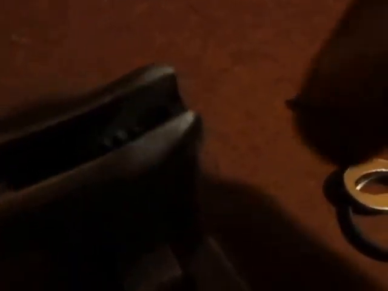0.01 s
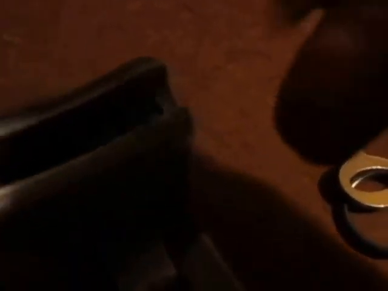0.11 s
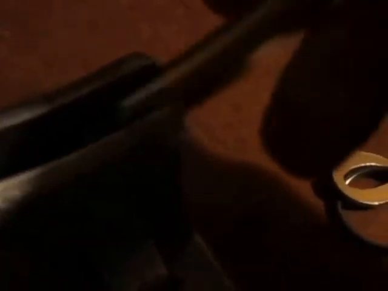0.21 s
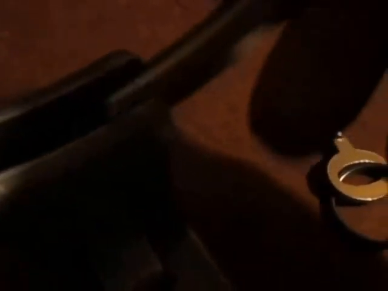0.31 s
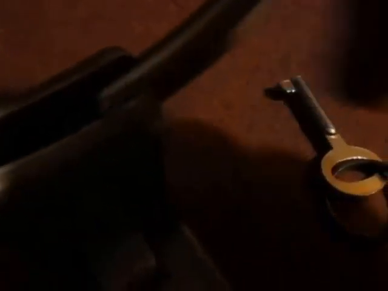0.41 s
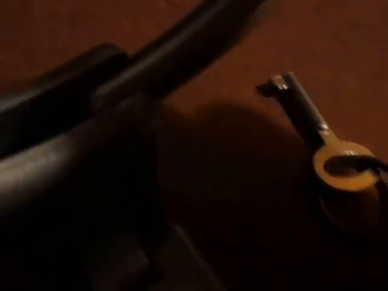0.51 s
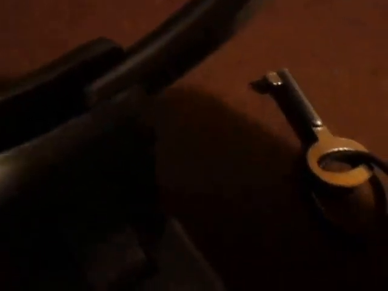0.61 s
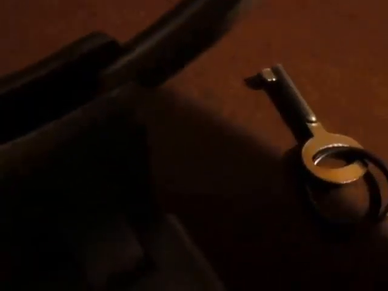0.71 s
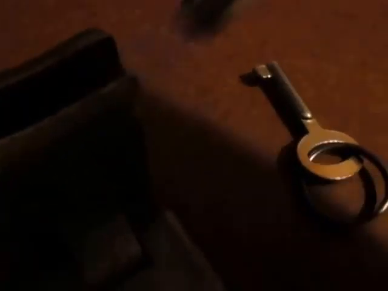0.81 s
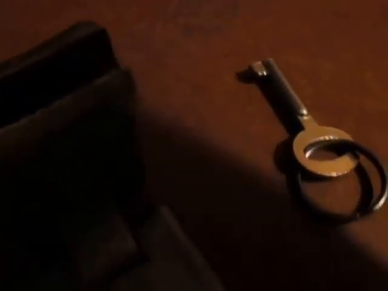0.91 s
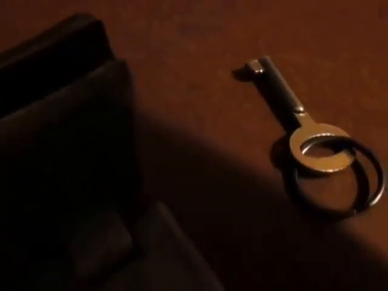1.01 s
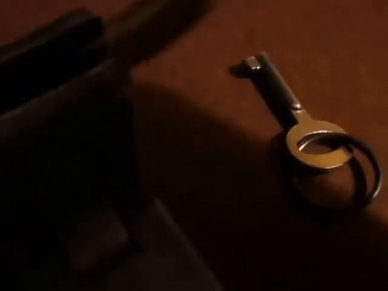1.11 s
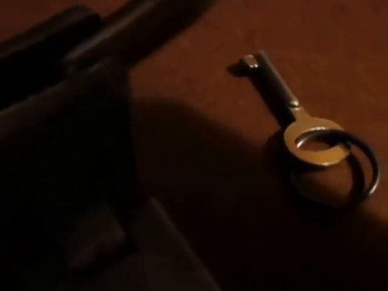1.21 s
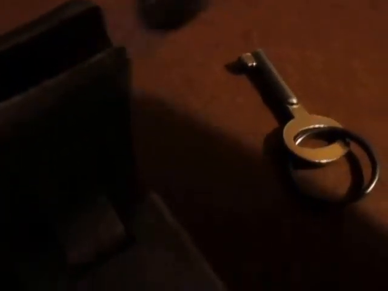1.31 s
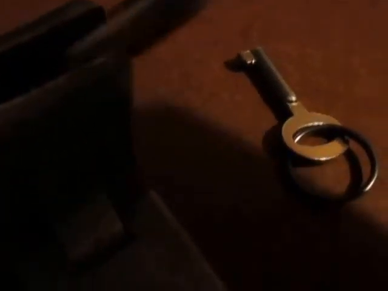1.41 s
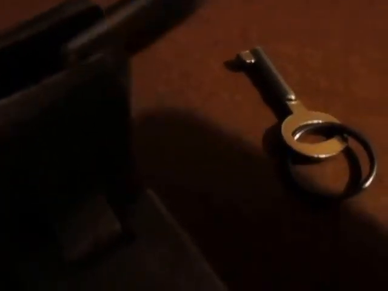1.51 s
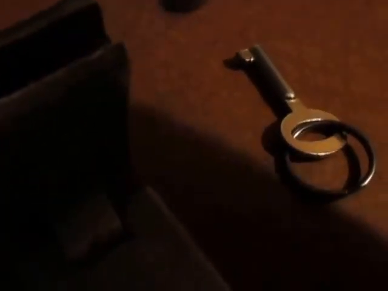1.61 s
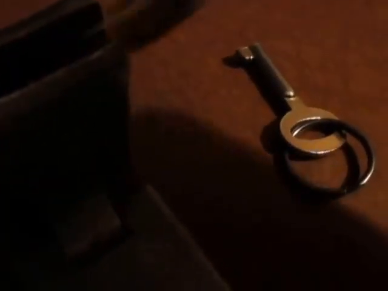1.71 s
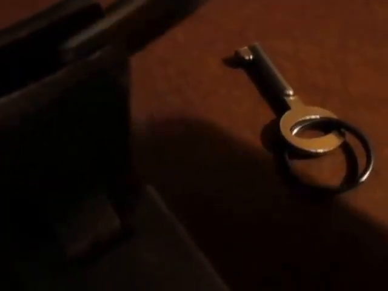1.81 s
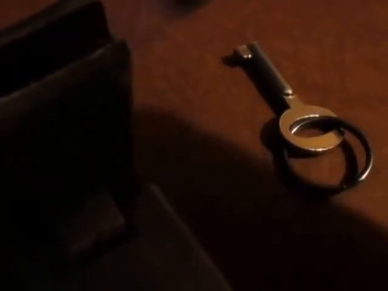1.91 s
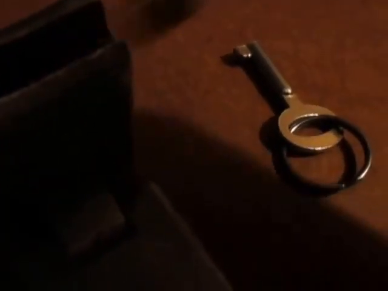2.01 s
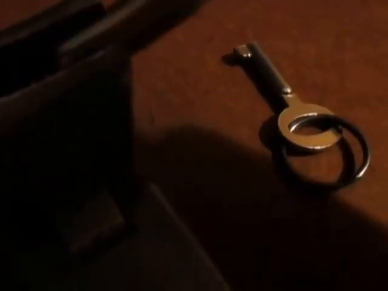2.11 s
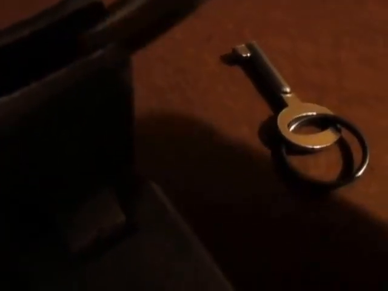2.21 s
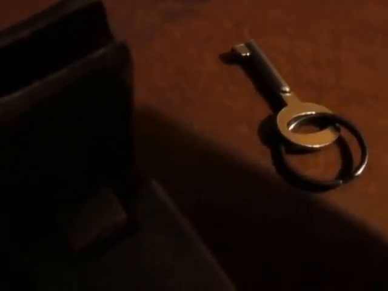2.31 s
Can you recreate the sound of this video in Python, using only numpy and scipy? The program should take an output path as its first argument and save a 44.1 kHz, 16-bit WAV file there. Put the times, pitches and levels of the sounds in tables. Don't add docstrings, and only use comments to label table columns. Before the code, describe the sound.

Metal handcuffs snap through their ratchet in sharp double clicks, knocking on a wooden table

```python
import sys
import numpy as np
from scipy import signal
from scipy.fft import rfft, irfft
from scipy.io import wavfile
from scipy.ndimage import uniform_filter1d, minimum_filter1d, map_coordinates

SR = 44100
rng = np.random.default_rng(int(sys.argv[2]) if len(sys.argv) > 2 else 0)


def gain_from_decibels(decibels):
    exponent = np.asarray(decibels, float) / 20
    return 10 ** exponent


def file_out(sig):
    cols = np.atleast_2d(sig).T
    lim = np.clip(cols, -1, 1)
    pcm = np.round(lim * 32767).astype(np.int16)
    wavfile.write(sys.argv[1], SR, pcm)


N = 105840


def unit(x):
    return x / np.sqrt(np.mean(x ** 2) + 1e-20)


def along(points, hz):
    point_hz, value = np.transpose(points)
    return np.interp(np.log(hz + 1), np.log(point_hz + 1), value)


def curve(rows):
    return np.interp(np.arange(N) / SR, *np.transpose(rows))


def wobble(rate):
    knots = rng.standard_normal(int(N / SR * 100))
    return map_coordinates(knots, [np.arange(N) * min(rate, 90) / SR])


def noise(spectrum, size=N):
    shape = gain_from_decibels(along(spectrum, np.fft.rfftfreq(size, 1 / SR)))
    return unit(irfft(rfft(rng.standard_normal(size)) * shape, size))


def add(track, s, x):
    part = track[max(round(s * SR), 0):][:len(x)]
    part += x[:len(part)]


def ring(modes, scatter_db, attack_s, tilt_db=0):
    t = np.arange(SR // 4) / SR
    hz, db, t60 = np.transpose(modes)[:, :, None]
    db = db + scatter_db * rng.standard_normal(hz.shape) + tilt_db * np.log2(hz / 5000)
    hz = hz * (1 + 0.012 * rng.uniform(-0.85, 1, hz.shape))
    partials = gain_from_decibels(db - 60 * t / t60) * np.sin(2 * np.pi * hz * t)
    return partials.sum(0) * (1 - np.exp(-t / attack_s))


# time_s, level_db
MOTOR_LOAD = [(0.0, -39), (0.19, -44.5), (.3, -55.5), (2.4, -59.5)]
# multiple of the turning rate, level_db
MOTOR_ORDERS = [(1, -56.5), (3, -55.5), (4, -66), (6, -71.5), (7, -77)]
# pitch_hz, level_db
WHINES = [(3941, -77), (11795, -80)]


def hum():
    t = np.arange(N) / SR
    turn_hz = 53.2 * (1 + .015 * wobble(12))
    turn = 2 * np.pi * np.cumsum(turn_hz) / SR
    out = gain_from_decibels(curve(MOTOR_LOAD) + 4.0 + 5.1 * wobble(18)) * np.sin(2 * turn)
    for multiple, db in MOTOR_ORDERS:
        out += gain_from_decibels(db + 1.2 * wobble(4.9)) * np.sin(multiple * turn)
    for hz, db in WHINES:
        out += gain_from_decibels(db + 3.5 * wobble(21)) * np.sin(2 * np.pi * hz * t)
    return out


# frequency_hz, level_db per Hz
AIR = [(15, -38.5), (25, -9), (65, 3), (104, -16), (316, -24), (480, -38.5), (1110, -28.5), (3200, -41.5),
       (9000, -74.5), (11700, -103), (19800, -120)]
# time_s, level_db
HANDS = [(0.0, -50.5), (.28, -51.5), (.35, -62), (.55, -62), (.7, -51.5), (1.2, -53.5), (1.65, -61.5),
         (2.04, -58.5), (2.4, -65.5)]
# frequency_hz, level_db per Hz
RUSTLE = [(120, -13), (200, -4.5), (371, -8.5), (698, -22), (1760, -21), (6060, -33.5), (8000, -90),
          (10400, -114), (17600, -120)]


def floor():
    air = gain_from_decibels(-53.5 + 1.5 * wobble(2.8)) * noise(AIR)
    rustle_db = curve(HANDS) - 1.0 + 2 * wobble(30)
    return air + gain_from_decibels(rustle_db) * noise(RUSTLE)


# time_s, leading_hz, lift_db, bottom_hz
LANDING = [(.014, 5890, 8, 2800), (.207, 6600, 4, 2800), (.217, 5830, 8, 400), (.236, 6400, 8, 400),
           (.658, 5010, 6, 1000), (.788, 5000, 8, 1500), (.99, 5900, 10, 4600), (1.087, 4500, 4, 1200),
           (1.105, 5910, 8, 800), (1.165, 6560, 8, 2200), (1.306, 5900, 6, 2000), (1.428, 4550, 6, 400),
           (1.453, 3940, 6, 1500), (1.474, 5000, 8, 3600), (1.748, 4370, 4, 400), (1.765, 3770, 8, 1800),
           (1.819, 4710, 8, 2500), (1.92, 5900, 6, 1500), (2.058, 4390, 8, 1500), (2.073, 7140, 8, 1500),
           (2.1, 7730, 14, 6800), (2.177, 4410, 6, 3600), (2.285, 2500, 4, 800)]


def landed(x, s):
    near_s, lead_hz, lift_db, low_hz = min(LANDING, key=lambda row: abs(row[0] - s))
    if abs(near_s - s) > .004:
        return x
    x = x + gain_from_decibels(lift_db) * signal.lfilter(*signal.iirpeak(lead_hz, 4, SR), x)
    return signal.sosfilt(signal.butter(4, low_hz, "high", fs=SR, output="sos"), x)


# pitch_hz, level_db, t60_s
STEEL = [(1850, -1, 0.012), (2255, -14, 0.028), (2800, -14.5, 0.035), (3258, -24, 0.0067),
         (3890, -1, 0.012), (4417, 10.5, 0.0058), (4946, -3.5, 0.014), (5902, 3.5, 0.014),
         (6620, 8.5, 0.0038), (7300, -19, 0.004), (7640, -4, 0.014), (9970, -18.5, 0.03),
         (9560, -19, 0.0051), (12500, -20, .012)]
# pitch_hz, level_db, t60_s
AFTER_RING = [(3135, -3.5, .12), (3460, -2.5, .07), (4000, -6.5, .1), (5400, -2, .07), (5950, -2.5, 0.12),
              (5550, -6, 0.043), (7100, -5.5, 0.056), (7770, -2, 0.062), (9460, -4, 0.15),
              (10700, -9, 0.064), (11230, -9, .08), (14160, -14.5, .1)]
# frequency_hz, level_db
CRACK = [(300, -7), (1500, -1), (4000, -7.5), (7000, -8.5), (10000, -6.5), (13000, -12), (17000, -20.5)]


def struck_steel(tilt_db, size):
    t = np.arange(size) / SR
    tilted = [(hz, db + tilt_db * np.log2(hz / 5000)) for hz, db in CRACK]
    crack_t60 = 0.0061
    crack = noise(tilted, size=size) * gain_from_decibels(11.5 - 60 * t / crack_t60)
    steel = ring(STEEL, scatter_db=2.5, attack_s=0.00016, tilt_db=tilt_db)
    steel += gain_from_decibels(-26) * ring(AFTER_RING, scatter_db=4.5, attack_s=0.0035)
    steel[:size] += crack
    return steel


# start_s, peak_db, brightness_db per octave, chatter_s, top_hz
CLICKS = [(0.2179, 2.5, -1, 0.0083, 13110), (0.2365, 0, -4, .005, 12500), (1.0864, -16, -2.5, 0.012, 9340),
          (1.1043, -12.5, -1, 0.0057, 10500), (1.1439, -1.5, 0.5, 0.007, 16540),
          (1.1658, -2, 9.5, 0.00325, 15540), (1.4272, -8.5, -1, .012, 12500), (1.453, -4, 4, 0.0084, 13860),
          (1.747, -5, 0.5, 0.0067, 16950), (1.7657, -3.5, 1, 0.0035, 15350), (2.058, -3.5, 3, 0.0024, 8980),
          (2.073, -1, 2.5, 0.0059, 14390)]
# start_s, peak_db, brightness_db per octave, chatter_s, top_hz
TICKS = [(0.01, -35.5, -5, 0.02, 6500), (0.2067, -14.5, 0.5, 0.0038, 8500), (0.276, -43, -5, 0.022, 6000),
         (0.43, -47, -3, .005, 5200), (0.449, -33.5, -5, 0.0065, 7000), (0.657, -26, -4, 0.0069, 10000),
         (0.791, -40, -3.5, 0.026, 5500), (0.9903, -27, 5, 0.0055, 8500), (1.081, -26.5, -2, 0.0087, 7000),
         (1.182, -29.5, -3, .05, 7000), (1.309, -40, -1.5, 0.02, 6200), (1.401, -38, -2.5, 0.031, 6500),
         (1.474, -27, -4, 0.0032, 6500), (1.528, -45.5, -4, 0.019, 5200), (1.776, -23, -2.5, .011, 10900),
         (1.818, -21, -1, 0.0045, 12000), (1.888, -39.5, -3, 0.006, 8500), (1.920, -38.5, -3, 0.0022, 7500),
         (1.988, -51.5, 5, 0.023, 5200), (2.098, -45, 8, 0.043, 8300), (2.177, -23.5, -1, 0.0043, 12500),
         (2.287, -45, -8.5, .004, 8000)]


def pawl():
    out, t = np.zeros(N), np.arange(4096) / SR
    lead_s, chatter_per_s, release_t60 = .004, 2800, .003
    since = t - lead_s
    scrape_db = -19 + 12 * since / lead_s
    for s, db, tilt_db, length, top_hz in CLICKS + TICKS:
        hits = rng.random(len(t)) < chatter_per_s / SR
        size = rng.standard_normal(len(t))
        chatter_db = -12.5 - 8.5 * since / length - 60 * np.maximum(since - length, 0) / release_t60
        blows = gain_from_decibels(np.where(since < 0, scrape_db, chatter_db)) * size * hits
        blows[round(lead_s * SR)] = min(.7, 0.015 / length)
        click = signal.fftconvolve(blows, struck_steel(tilt_db, len(t)))
        click = signal.sosfilt(signal.butter(8, top_hz * .98, fs=SR, output="sos"), click)
        click = landed(click, s)
        add(out, s - lead_s, gain_from_decibels(db) * click / np.abs(click).max())
    return out


# pitch_hz, level_db, t60_s
CUFF = [(623, 0, 0.041), (702, -1, 0.025), (814.5, -11.5, 0.03), (1089, -9, 0.032), (1282, -19.5, 0.049)]
# pitch_hz, level_db, t60_s
TABLE = [(229.9, -5.5, 0.035), (306, -5.5, 0.051), (369.8, -1, 0.054), (515, -8.5, 0.036)]
# time_s, level_db
GRIP = [(0, 9.5), (.1, 3.5), (.2, -7), (.66, 0), (.75, -6), (1, -3.5), (1.32, 1), (1.45, -1.5), (1.82, 6),
        (2, 0.5), (2.15, 9.5)]


def knock_body(s, db, table_db):
    free_db = np.interp(s, *np.transpose(GRIP))
    cuff = []
    for (hz, level, t60), side in zip(CUFF, (-.5, .5, .5, 0, 0)):
        hard_db = (hz > 1000) * .25 * (db + 22)
        cuff.append((hz, level + free_db * side + hard_db, t60))
    knock = ring(cuff, scatter_db=4.0, attack_s=0.00091)
    knock += gain_from_decibels(table_db) * ring(TABLE, scatter_db=5.0, attack_s=0.0017)
    return knock / np.abs(knock).max()


# start_s, peak_db, table over cuff_db
KNOCKS = [(0.014, -23, -8), (0.099, -29.5, -1), (0.168, -36.5, -2), (0.386, -28.5, 5.5),
          (0.449, -24.5, 2.5), (0.66, -25.5, -7), (0.724, -41.5, -21), (0.789, -23.5, 10),
          (0.904, -41.5, 12), (0.989, -18, -0.5), (1.32, -29, 5.5), (1.398, -30, 8.5), (1.528, -37, 0),
          (1.632, -33, 1.5), (1.694, -42.5, 5.5), (1.819, -27, -7), (1.896, -32, 1.5), (2.015, -34, 3),
          (2.154, -37.5, -13), (2.179, -30, -1.5), (2.29, -31, 4)]
# start_s, peak_db, table over cuff_db
SLAMS = [(0.204, -17.5, -3), (.217, -8, -1.5), (0.2359, -13.5, 4.5), (1.105, -20.5, 14.5),
         (1.1442, -10, -6.5), (1.164, -14.5, -2.5), (1.4267, -14.5, 1.5), (1.455, -14, -5.5),
         (1.7474, -10, -10.5), (1.7636, -15.5, -3.5), (2.0564, -13, -9.5), (2.074, -14.5, -4)]
# start_s, peak_db, panel ring over push_db
THUMPS = [
    (.237, -15, 0),
    (.661, -33, 0),
    (1.1045, -25, -4),
    (1.165, -14, -1),
    (1.454, -15.5, -9),
    (1.766, -15, 0),
    (2.074, -15, 0),
    (2.291, -36, 0),
]
# pitch_hz, level_db, t60_s
PANEL = [(130.2, -8.5, 0.25), (104, -5.5, 0.07), (183, -15, 0.079)]


def frame():
    out = np.zeros(N)
    for s, db, table_db in list(KNOCKS) + SLAMS:
        rebound_s = 0.007273 * rng.uniform(0.6776, 1.3)
        for late, loss_db in ((0, 0), (rebound_s, -6.5)):
            add(out, s + late, -gain_from_decibels(db + loss_db) * knock_body(s, db, table_db))
    push_s = 0.008
    push = np.sin(np.pi * np.arange(round(push_s * SR)) / (push_s * SR)) ** 2
    for s, db, ring_db in THUMPS:
        add(out, s, gain_from_decibels(db) * push)
        add(out, s + push_s * 0.63, -gain_from_decibels(db + ring_db) * ring(PANEL, scatter_db=1.5, attack_s=0.0019))
    return signal.sosfilt(signal.butter(2, 48.9, "high", fs=SR, output="sos"), out)


# start_s, length_s, pitch_hz, level_db
SQUEAKS = [
    (.82, .11, 1790, -59),
    (1.23, .05, 1790, -60),
    (2.24, .05, 4200, -60),
    (1.075, .025, 1750, -44),
    (1.471, .03, 11250, -52),
    (1.82, .03, 11500, -56),
    (.243, .03, 9460, -46),
]


def rivet():
    out = np.zeros(N)
    for s, length, hz, db in SQUEAKS:
        n = round(length * SR)
        tone = np.sin(2 * np.pi * np.cumsum(hz * (1 + .008 * wobble(60)[:n])) / SR)
        swell = np.sin(np.pi * np.arange(n) / n) ** 0.28
        add(out, s, gain_from_decibels(db + 2.0 + 2.32 * wobble(80)[:n]) * tone * swell)
    return out


# frequency_hz, t60_s
ROOM = [(200, 0.38), (2000, 0.39), (6000, 0.04), (10000, .04)]


def room(x):
    hz, t, z = signal.stft(rng.standard_normal(SR // 3), SR, nperseg=256)
    decay = gain_from_decibels(-60 * t / along(ROOM, hz)[:, None])
    tail = signal.istft(z * decay, SR, nperseg=256)[1]
    return signal.fftconvolve(np.pad(x, (300, 0)), tail / np.linalg.norm(tail))[:N]


def scene():
    cuffs = pawl() + frame() + rivet()
    return (cuffs + gain_from_decibels(-28.5) * room(cuffs) + hum() + floor())[None]


def blocks(x, size, start, keep):
    lead = -start % (size // 2)
    window = np.sin(np.pi * (np.arange(size) + .5) / size)
    hz, _, z = signal.stft(np.pad(x, (lead, 0)), SR, window=window, nperseg=size)
    kept = z * keep(hz, np.abs(z) ** 2)
    return signal.istft(kept, SR, window=window, nperseg=size)[1][lead:][:N]


def banded(x, size):
    band = np.arange(len(x)) // size
    total = np.add.reduceat(x, np.arange(0, len(x), size))
    return (total / np.bincount(band)[:, None])[band]


# frequency_hz, level_db
MASK = [(800, -60), (1500, -29.5), (3000, -24), (6000, -26.5), (10000, -25), (16000, -30.5)]


def keep_bands(hz, power):
    bands = banded(power, size=5)
    hold_s = 0.019
    peak = -minimum_filter1d(-bands[5:].max(0), size=1 + 2 * round(hold_s * SR / 128))
    draws = np.repeat(rng.standard_normal(power[:, ::3].shape), 3, 1)[:, :len(peak)]
    scatter = banded(draws, size=5) * np.sqrt(5)
    return bands > peak * gain_from_decibels(2 * (along(MASK, hz)[:, None] + 7 * scatter))


# frequency_hz, level_db
SPARSE = [(500, -36), (1200, -11), (2000, -7), (3000, -2.5), (5000, -5.5), (8000, -5), (12000, -7.5),
          (16000, -8.5)]


def keep_lines(hz, power):
    middle = power[(hz > 1000) & (hz < 3000)].mean(0)
    scatter = banded(rng.standard_normal(power.shape), size=16) * 4
    return power > middle * gain_from_decibels(2 * (along(SPARSE, hz)[:, None] + 5.5 * scatter))


# start_s, end_s
SHORT_BLOCKS = [(.2, .24), (.43, .448), (.64, .658), (.98, .995), (1.08, 1.168), (1.427, 1.47),
                (1.73, 1.819), (1.87, 1.93), (2.055, 2.09), (2.17, 2.19), (2.27, 2.288)]


def masked(x):
    offset = 908

    def frame_at(n):
        return (n - offset + 512) // 1024

    frames = frame_at(np.arange(N))
    short = np.zeros(N, bool)
    for start_s, end_s in SHORT_BLOCKS:
        short |= (frames >= frame_at(start_s * SR)) & (frames <= frame_at(end_s * SR))
    share = np.clip(uniform_filter1d(short * 1., size=128), 0, 1)
    rest = np.sqrt(1 - share)
    attacks = blocks(x * share, 256, offset + 448, keep_bands)
    return attacks + rest * blocks(x * rest, 2048, offset, keep_lines)


def low_pass(x):
    return signal.sosfilt(signal.butter(12, 16810, fs=SR, output="sos"), x)


def record(dry):
    clipped = dry / (1 + np.abs(dry) ** 8) ** (1 / 8)
    heard = masked(clipped[0])[None]
    limited = irfft(rfft(heard) * (np.fft.rfftfreq(N, 1 / SR) < 16810), N)
    return low_pass(limited)


dry = scene()
out = record(dry)
file_out(out)
```